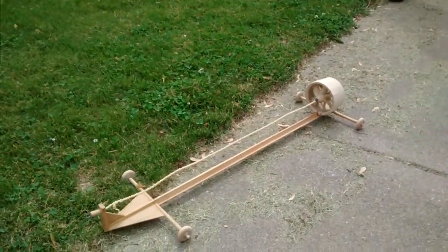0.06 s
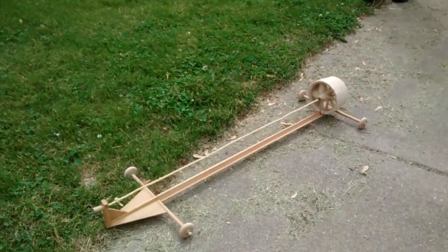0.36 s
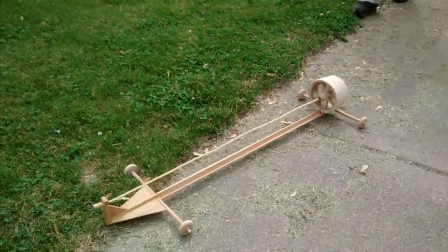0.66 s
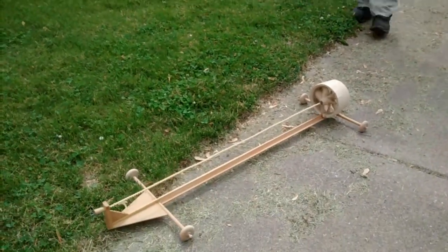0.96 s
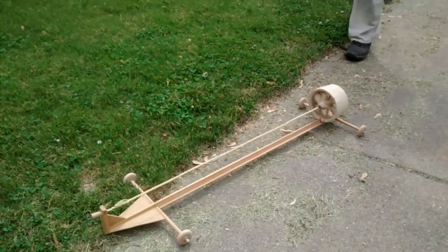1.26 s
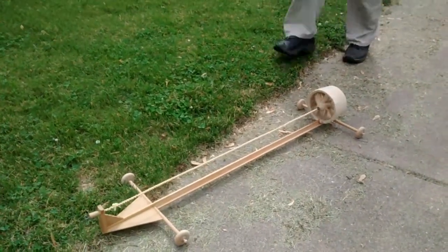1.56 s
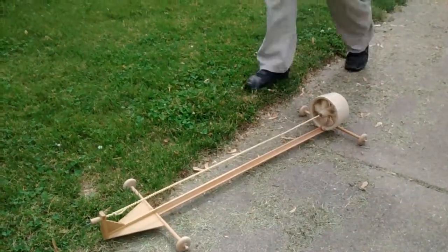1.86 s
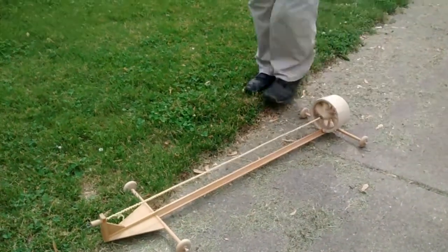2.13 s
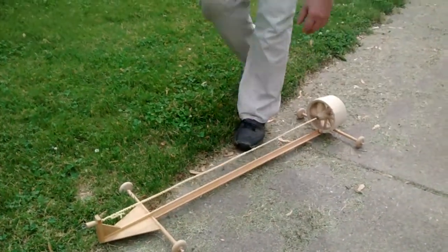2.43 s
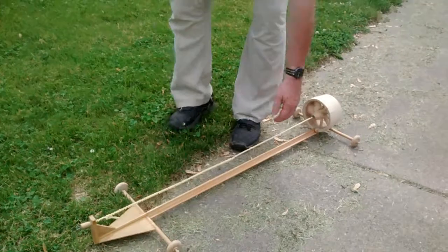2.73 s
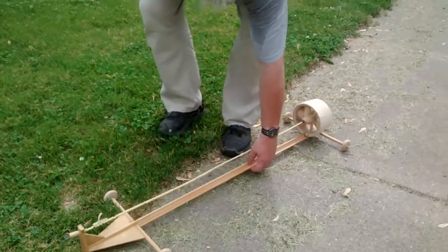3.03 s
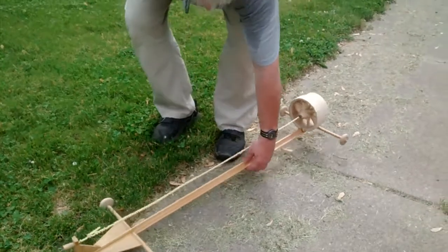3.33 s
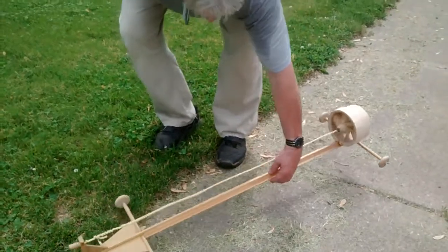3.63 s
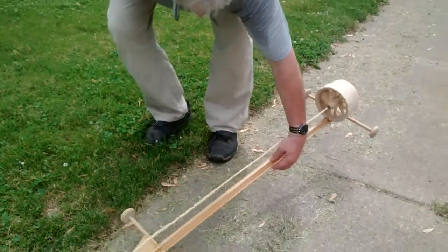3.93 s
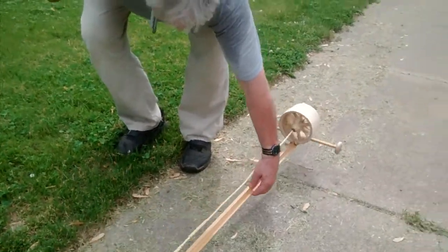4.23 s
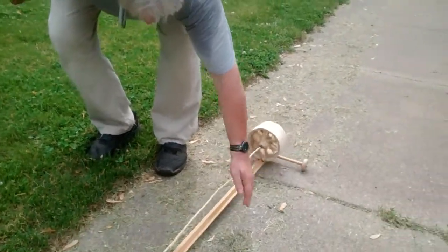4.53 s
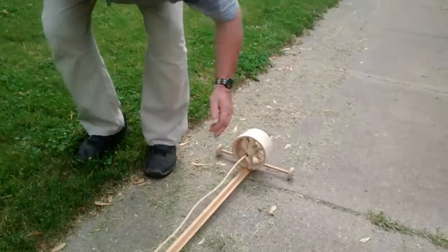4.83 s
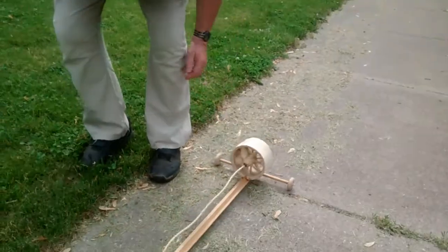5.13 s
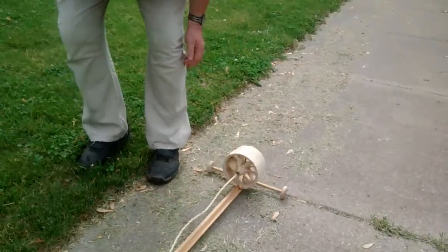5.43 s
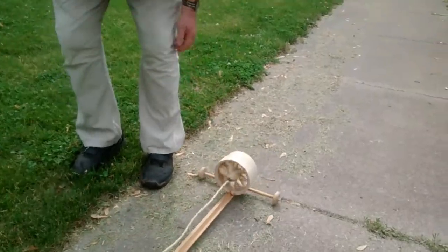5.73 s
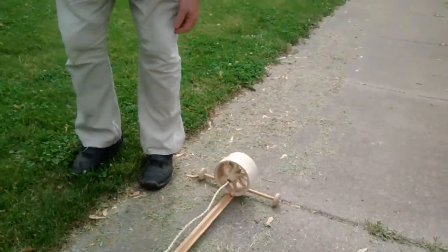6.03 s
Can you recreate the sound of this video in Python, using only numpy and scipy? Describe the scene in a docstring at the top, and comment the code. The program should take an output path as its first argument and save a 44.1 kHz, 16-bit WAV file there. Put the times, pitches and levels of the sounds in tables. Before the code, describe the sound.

The loose rotor of a wooden rubber-band toy car spins close by, clattering rapidly in its drum over a dry whirr. Grit clicks as the car is lifted, the rotor scrapes and the frame knocks. The car lands bouncing on concrete and the rotor stops suddenly, leaving light taps. Throughout, something like a ball thumps in the distance about once a second, echoing over a soft outdoor hush.

```python
"""A rubber-band wooden fan car runs on a garden pavement, its loose rotor clattering in the drum
over a dry whirr of wood rubbing wood. As the car is lifted, grit clicks, the rotor scrapes and the
spar knocks; it lands bouncing on its wheels and the rotor stops. Light taps follow. About once a
second something like a bouncing ball thumps farther off and echoes from the houses, over a soft hush."""
import sys
import numpy as np
from scipy import signal
from scipy.fft import rfft
from scipy.io import wavfile

SR = 44100
rng = np.random.default_rng(int(sys.argv[2]) if len(sys.argv) > 2 else 0)


def wav_out(sig):
    """Save sig, one row per channel (or a flat mono array), as 16-bit PCM at SR to the path in sys.argv[1]."""
    wavfile.write(sys.argv[1], SR, np.round(np.clip(np.atleast_2d(sig).T, -1, 1) * 32767).astype(np.int16))


N = 276948
T = np.arange(N) / SR


def gain_of(db):
    """Decibels to amplitude."""
    return 10 ** (np.asarray(db) / 20)


def unit_rms(x):
    """Scales to rms 1."""
    return x / np.sqrt(np.mean(x ** 2) + 1e-20)


def add(mix, start_s, sound):
    """Mixes a stereo sound in at start_s."""
    part = mix[:, max(round(start_s * SR), 0):][:, :sound.shape[1]]
    part += sound[:, :part.shape[1]]


def wander(per_s):
    """A random curve of roughly unit spread with per_s new values a second."""
    steps = np.clip(rng.standard_normal(size=1024), -2, 2)
    return np.interp(T * per_s, np.arange(len(steps)), steps)


def band(x, low_hz, high_hz):
    """One frequency band of x, in phase with x."""
    return signal.filtfilt(*signal.butter(2, [low_hz, high_hz], "bandpass", fs=SR), x)


def body(drive, colour, modes=(), size=8192):
    """Rings a body of unit overall gain: colour is its broad stereo EQ, modes are its resonant peaks."""
    hz = abs(np.fft.fftfreq(size, 1 / SR))
    points_hz, *columns = np.transpose(colour)
    left_db, right_db, likeness = (np.interp(np.log(hz + 1), np.log(points_hz + 1), c) for c in columns)
    lift_db = sum(db / (1 + (2 * (hz - f) / width) ** 2) for f, width, db in modes)
    gains = gain_of(np.array([left_db, right_db]) + lift_db)
    gains /= np.sqrt(np.mean(gains.mean(0) ** 2))
    minimum_phase = np.exp(-1j * signal.hilbert(np.log(gains.mean(0))).imag)
    likeness = np.clip(likeness, -1, 1)  # left-right correlation
    # drive[0] reaches both ears, drive[1] only the right
    paths = np.array([gains[0], gains[1] * likeness, gains[1] * np.sqrt(1 - likeness ** 2)])
    rings = np.fft.fftshift(np.fft.ifft(paths * minimum_phase).real, axes=1)
    rung = signal.fftconvolve(drive[[0, 0, 1]], rings, axes=1)
    left, right_shared, right_own = rung[:, size // 2:][:, :N]
    return np.array([left, right_shared + right_own])


def blows(rows, loose, tail_db, tail_t60, rise_s=0.0019, size=6000, level_band_hz=None):
    """Each row (start_s, level_db, t60_s) is a click, chatter and a tail; loose is the chatter's share."""
    t, hz = np.arange(size) / SR, np.fft.rfftfreq(size, 1 / SR)
    drive = np.zeros((2, N))
    swell = 1 - np.exp(-t / rise_s)
    for s, db, t60 in rows:
        chatter, tail = swell * rng.standard_normal((2, 2, size))
        chatter = np.sqrt(loose) * unit_rms(chatter * gain_of(-60 * t / t60))
        tail = gain_of(tail_db) * unit_rms(tail * gain_of(-60 * t / tail_t60))
        blow = (chatter + tail) / np.sqrt(size)
        blow[0, 0] += np.sqrt(1 - loose)  # the click
        if level_band_hz:  # set the blow's strength within this band
            inside = (hz > level_band_hz[0]) & (hz < level_band_hz[1])
            blow[0] /= np.sqrt(np.mean(abs(rfft(blow[0])[inside]) ** 2))
        blow[1] *= np.linalg.norm(blow[0]) / np.linalg.norm(blow[1])
        add(drive, s, gain_of(db) * blow)
    return drive


BLADES_PER_S = 96
CHATTER_T60_S, HARD_HIT_DB = .01, -22.7  # hits above this level chatter longer and crack
# the drum's resonances: pitch_hz, width_hz, lift_db
DRUM_MODES = [(449.7, 19, 9), (740, 67, 6.5), (970, 40, 8.5), (1224, 86, 6.5), (1622, 58, 5.5),
              (1743, 170, 2.5), (3555, 290, 3.5), (4700, 250, 4), (5970, 110, 4), (6422, 110, 3)]


def drum(drive, colour, detune):
    """The rotor's contact wanders between three spots of the drum, tuned low, middle and high."""
    spot = np.clip(np.round(wander(BLADES_PER_S / 2)), -1, 1)
    out = np.zeros((2, N))
    for k in (-1, 0, 1):
        modes = [(hz * (1 + detune * k), width, db) for hz, width, db in DRUM_MODES]
        out += body(drive * (spot == k), colour, modes)
    return out


# how hard the rotor rubs: time_s, level_db
RUBBING = [(0, -28), (0.44, -28), (0.62, -31.5), (1.34, -30), (2.22, -32.5), (3.12, -32.5), (3.25, -36),
           (3.35, -30.5), (3.881, -36), (4.12, -30.5), (4.64, -32)]
# moments when it spins clear of the drum: centre_s
LULLS = [0.49, 0.628, 0.74, 0.842, 0.972, 1.09, 1.345, 1.525, 1.69, 1.768, 1.95, 2.135, 2.228, 2.325, 2.89,
         3.245]


def rotor_level(lull_db=-8, lull_half_s=.013, stop_s=4.65, stop_db_per_s=1100):
    """The rotor's contact strength sinks in each lull and dies quickly when the rotor stops."""
    clear = sum(np.exp(-((T - s) / lull_half_s) ** 2) for s in LULLS)
    stop_db = stop_db_per_s * np.maximum(T - stop_s, 0)
    return gain_of(np.interp(T, *np.transpose(RUBBING)) + lull_db * clear - stop_db)


# dry, midrange rub: freq_hz, left_db, right_db, likeness
WHIRR_COLOUR = [(208, -31, -14, -1.44), (420, -13.5, -11.5, 0.91), (1020, -2.5, -2.5, 1),
                (1670, -1.5, 3.5, 0.97), (1960, -3.5, 4.5, -0.33), (2350, -7.5, -8, -0.22),
                (3170, -5, 0, 0.19), (4240, -14.5, -12.5, 0.93), (4600, -24, -20, 1),
                (5300, -23, -26, 0.89), (6300, -25, -23.5, 0.91), (8940, -26, -31, 1),
                (9800, -51, -61, -0.98), (15000, -43, -47, 0.62)]


def whirr(level_db=-1.5, slips_per_s=1500, spread_db=3):
    """Wood rubs on wood in tiny slips of uneven strength."""
    slips = rng.random(N) < slips_per_s / SR
    strength = gain_of(spread_db * np.minimum(rng.exponential(1, N), 4))
    drive = unit_rms(slips * strength * rng.standard_normal((2, N)))
    return drum(drive * rotor_level() * gain_of(level_db), WHIRR_COLOUR, detune=.018)


def blade_ticks(level_db=20, scatter_db=4.5, jitter=0.1417):
    """The passing blades tick lightly on the drum, slightly out of step."""
    passes = np.arange(int(5.1 * BLADES_PER_S))
    late, force = np.clip(rng.standard_normal((len(passes), 2)).T, -2, 1)
    starts = (passes + jitter * late) / BLADES_PER_S
    rows = [(s, db, CHATTER_T60_S) for s, db in zip(starts, level_db + scatter_db * force)]
    return blows(rows, loose=0.5, tail_db=-8.5, tail_t60=0.012, size=1000) * rotor_level()


# regions of the drum's ring that each blade favours differently: low_hz, high_hz, spread_db
STRIKE_BANDS = [(1400, 1900, 2), (1900, 2500, 3), (2750, 3300, 2.5), (3500, 4400, 2), (4960, 7400, 4)]
# bright, woody clack: freq_hz, left_db, right_db, likeness
CLACK_COLOUR = [(245, -28.5, -28, 1.5), (790, -22.5, -23, 0.6), (1183, -12, -13.5, 2.5),
                (1667, -9, -0.5, 0.62), (2085, -15, -9, 0.06), (2630, -25, -31, -1),
                (2846, -5.5, -7.5, 1.5), (3775, -6, -1, 1), (3897, -15.5, -8, 0.5), (4860, -31, -19, -1.5),
                (5650, -20, -27, -3), (5780, -35.5, -28.5, 2.2), (7920, -28, -40.5, -2.13),
                (7980, -23.5, -21, -1), (9600, -56, -71, 4.5)]


def clatter(hard_db=23.5):
    """Light ticks and hard strikes ring the drum; each blade hits its own spot, so the tone shifts."""
    drive = blade_ticks() + gain_of(hard_db) * hard_strikes()
    shifts = sum((gain_of(spread_db * wander(BLADES_PER_S)) - 1) * band(drive, low, high)
                 for low, high, spread_db in STRIKE_BANDS)
    return drum(drive + shifts, CLACK_COLOUR, detune=.028)


# the outdoor bed, which dips briefly near 4.7 s: time_s, level_db
YARD_LEVEL = [(0, -40.5), (4.0, -40.5), (4.72, -44.5), (4.9, -44), (5.3, -42), (6.28, -40.5)]
# low rumble and soft air: freq_hz, left_db, right_db, likeness
YARD_COLOUR = [(22, 6, 6.5, -1.2), (66, -6.5, -5, 0.024), (143, -5.5, -1.5, 0.2), (315, -8, -7, 0.63),
               (715, -4, -4.5, 0.97), (1490, -10, -5, 0.94), (2580, -8, -4, -1.18),
               (3580, -14, -12.5, 0.81), (4400, -28, -12.5, -0.88), (5340, -20, -22.5, -0.42),
               (14900, -33.5, -33, 0.14)]
# peaks in the hush: pitch_hz, width_hz, lift_db
YARD_MODES = [(71.4, 7.4, 5.2), (126.6, 6, 13.6), (463, 57, 3.9), (1440, 190, 7.3), (3650, 190, 7.7)]


def yard(waver_db=1.5, wavers_per_s=19):
    """Gently wavering outdoor hush."""
    level_db = np.interp(T, *np.transpose(YARD_LEVEL)) + waver_db * wander(wavers_per_s)
    return body(rng.standard_normal((2, N)) * gain_of(level_db), YARD_COLOUR, YARD_MODES)


# single hits of the loose rotor on its drum: start_s, level_db
CLACKS = [(0.0267, -22.5), (0.0436, -23.5), (0.0693, -18.5), (0.1158, -24.0), (0.1317, -23.0),
          (0.1415, -19.0), (0.2052, -25.0), (0.215, -24.0), (0.2333, -22.5), (0.242, -21.0),
          (0.2591, -19.5), (0.2735, -23.0), (0.2868, -16.5), (0.3005, -16.0), (0.3205, -23.0),
          (0.3299, -21.0), (0.3509, -16.5), (0.3707, -23.0), (0.3877, -20.5), (0.4327, -20.0),
          (0.4428, -16.0), (0.4592, -21.5), (0.5307, -25.0), (0.5525, -24.5), (0.7541, -23),
          (0.7634, -23.5), (0.79, -22.5), (0.8061, -17.5), (0.8185, -17.5), (0.8575, -21.5),
          (0.8743, -18.0), (0.8844, -18.0), (0.9015, -21.0), (0.9107, -20.5), (0.9215, -19.0), (0.934, -22),
          (0.9393, -19.5), (0.9515, -24.0), (0.9608, -18.0), (0.9902, -21.5), (0.9992, -24.0),
          (1.016, -15.5), (1.0374, -22.5), (1.1235, -23.0), (1.1302, -22.5), (1.1812, -21.5),
          (1.1885, -15.0), (1.1959, -16.5), (1.2498, -23.0), (1.2847, -23.5), (1.309, -24.5), (1.3475, -25),
          (1.421, -23.5), (1.4423, -23.5), (1.4702, -21.5), (1.478, -23), (1.4876, -21.5), (1.4979, -23.5),
          (1.5486, -20.5), (1.558, -22.5), (1.5681, -22.5), (1.5763, -25.0), (1.5853, -22.0),
          (1.7221, -24.5), (1.8136, -25.0), (1.9104, -25.0), (1.9188, -23.5), (2.0117, -19.5),
          (2.0397, -24.0), (2.067, -25.0), (2.0852, -20.5), (2.1769, -19.0), (2.1992, -23.5),
          (2.2471, -22.5), (2.2774, -24.0), (2.289, -26.0), (2.3427, -20.0), (2.3515, -24.5),
          (2.3645, -23.0), (2.4223, -24.5), (2.4319, -23), (2.451, -24.5), (2.5205, -24.5), (2.5295, -23.0),
          (2.5548, -25.0), (2.5975, -21.0), (2.6161, -23.5), (2.7345, -21.0), (2.8001, -24.0),
          (2.838, -24.0), (2.8493, -18.5), (2.9218, -23.5), (2.9306, -24.5), (3.0978, -15.0), (3.208, -28),
          (3.325, -23.0), (3.3426, -22.5), (3.3642, -23.0), (3.501, -24.0), (3.554, -22.5), (3.582, -25.0),
          (3.625, -26.0), (3.715, -19.5), (3.8152, -27.0), (4.0722, -22.0), (4.0921, -22.0)]


def hard_strikes(bite_db=4, unwind_s=1.1, rise_s=.0007, chatter_s_per_db=.0012, low_lag=.5):
    """Harder hits are brighter and longer, with a scratchy bite while the rubber band is wound tight."""
    singles = [(s, db, CHATTER_T60_S + chatter_s_per_db * max(db - HARD_HIT_DB, 0)) for s, db in CLACKS]
    rows = sorted(singles + rattles())
    drive = blows(rows, loose=0.64, tail_db=-12.5, tail_t60=0.07, rise_s=rise_s, size=4000,
                  level_band_hz=(2900, 3800))  # the drum's main ring
    starts, levels_db, _ = np.transpose(rows)
    latest_hit = np.maximum(np.searchsorted(starts, T + rise_s) - 1, 0)
    excess_db = np.maximum(levels_db[latest_hit] - HARD_HIT_DB, 0)
    # the low ring grows less with force than the main one
    low_cut = (gain_of(-low_lag * excess_db) - 1) * band(drive, 1100, 2400)
    bite = gain_of(bite_db) * np.exp(-T / unwind_s) * band(drive, 5300, 7400)
    return drive + low_cut + bite


# sharp treble edge: freq_hz, left_db, right_db, likeness
CRACK_COLOUR = [(1520, -26, -26, 0.63), (2220, -0.5, 8.5, 0.19), (4301.6, 4, 10, 0.2), (5130, -8, -9, 0.64),
                (6300, -3, -3.5, 0.41), (8340, -13, -19, 0.28), (10000, -25, -34, 0.33),
                (14900, -31, -28, 0.46)]


def cracks(level_db=-13, growth=.9):
    """The hardest strikes add a short, bright crack of bare wood on wood."""
    rows = [(s, level_db + growth * (db - HARD_HIT_DB), .008) for s, db in CLACKS if db > HARD_HIT_DB]
    return body(blows(rows, loose=.4, tail_db=-14, tail_t60=.03, size=2000), CRACK_COLOUR)


# softer runs of blade strikes between the clacks: start_s, length_s, level_db
RATTLES = [(0.181, 0.023, -27), (0.501, 0.018, -26), (0.642, 0.028, -28), (1.047, 0.02, -28),
           (1.108, 0.015, -27), (1.262, 0.07, -27), (1.598, 0.028, -27), (1.641, 0.035, -27),
           (1.789, 0.056, -28), (1.86, 0.045, -27), (2.39, 0.028, -28), (2.645, 0.05, -28),
           (3.06, 0.03, -30), (3.292, 0.03, -29), (3.42, 0.035, -27), (3.903, 0.09, -29)]


def rattles(hits_per_s=108, fade_db=-3, scatter_db=2, jitter=.1, max_hits=12):
    """Rows for blows: in each run the blades strike at a nearly even rate, weakening towards the end."""
    rows, hit = [], np.arange(max_hits)
    for start_s, length_s, db in RATTLES:
        late, force = np.clip(rng.standard_normal((2, max_hits)), -1.5, 1.5) * (hit > 0)
        ages = (hit + jitter * late) / hits_per_s
        levels_db = db + fade_db * ages / length_s + scatter_db * force
        shares = np.clip(length_s * hits_per_s - hit, 0, 1)  # softens the last hit
        rows += [(start_s + age, hit_db + 20 * np.log10(share), CHATTER_T60_S)
                 for age, hit_db, share in zip(ages, levels_db, shares) if share > 0]
    return rows


# distant bounces: start_s, boom_db, slap_db
THUMPS = [(0.416, -33.5, -21), (1.379, -32, -20), (2.527, -29.5, -21), (3.402, -30.5, -19),
          (4.281, -32, -22.5), (5.342, -31.5, -24.5), (6.196, -36, -30)]
# the direct sound, then its echoes off the houses: delay_s, gain_db
ARRIVALS = [(0, 2.5), (0.036, -8.5), (.076, -3), (.145, -10.5)]
# deep, round boom: freq_hz, left_db, right_db, likeness
BOOM_COLOUR = [(25, -10, -19, .3), (53.7, -9, -1, 0.73), (97, 8, 8, 0.87), (140, -3.5, -1.5, 0.91),
               (220, -6, -3.5, 0.76), (400, -16, -42, 0.98), (1500, -86, -89, .9)]
# soft midrange slap: freq_hz, left_db, right_db, likeness
SLAP_COLOUR = [(170, -8, -11, 0.87), (340, -8, -7.5, 0.82), (754, -6, -3.5, 1), (1180, -1.5, 0.5, 1),
               (2060, -17, -2.5, 0.46), (3630, -37, -15, 0.067), (6130, -35, -23, 0), (13900, -63, -64, 0)]


def thumps(boom_db=24, slap_db=18.5, echo_slap_db=-9, second_slap_s=.013, second_slap_db=-7):
    """A low boom with a soft double slap; the walls send it back duller."""
    booms = [(s + delay, db + path_db, .05) for s, db, _ in THUMPS for delay, path_db in ARRIVALS]
    slaps = [(s + delay, db + path_db + echo_slap_db * (delay > 0), .026)
             for s, _, db in THUMPS for delay, path_db in ARRIVALS]
    slaps += [(s + second_slap_s, db + second_slap_db, .026) for s, _, db in THUMPS]
    boom = body(blows(booms, loose=0.12, tail_db=-7, tail_t60=0.22), BOOM_COLOUR)
    slap = body(blows(slaps, loose=.9, tail_db=-6, tail_t60=.11, rise_s=.0012), SLAP_COLOUR)
    return gain_of(boom_db) * boom + gain_of(slap_db) * slap


# the hand closes on the frame: time_s, grip_share
GRIP = [(3.15, 0), (3.45, 0.75)]
# the held car's ring sinks and turns hollow: centre_hz, width_hz, change_db
GRIP_EQ = [(1690, 300, -7), (1500, 80, 5), (880, 380, 4), (2960, 160, -6), (3610, 260, -16)]


def hand_grip(sound):
    """The hand damps some resonances of the frame and lets others through."""
    grip = np.interp(T, *np.transpose(GRIP))
    change = sum((gain_of(db) - 1) * signal.lfilter(*signal.iirpeak(hz, hz / width, SR), sound)
                 for hz, width, db in GRIP_EQ)
    return sound + grip * change


# clicks under the wheels: start_s, level_db
GRIT_CLICKS = [(3.408, -1), (3.456, 7), (4.5, -6), (4.572, -3)]
# bright, dry snap: freq_hz, left_db, right_db, likeness
GRIT_COLOUR = [(400, -10, -10.5, 1), (1360, 9.5, 12, 1), (2460, 3, 7, 0.011), (4130, 7, 9, 0.38),
               (7850, -11, -7, 0.3), (9200, -15, -37, 0.098), (10100, -42, -26, 0), (15000, -45, -47, 0)]


def grit():
    """Grit clicks as the wheels leave and meet the concrete."""
    drive = blows([(s, db, .02) for s, db in GRIT_CLICKS], loose=0.92, tail_db=-8, tail_t60=0.09)
    return body(drive, GRIT_COLOUR)


# drags along the drum wall: start_s, length_s, level_db
SCRAPES = [(3.812, 0.074, -36), (3.9, 0.153, -33)]
# narrow ring near 3 kHz: freq_hz, left_db, right_db, likeness
SCRAPE_COLOUR = [(999, -41, -27, 1), (2600, -24, -11, 0.15), (2950, 3, 4, 0.92), (3620, -3, 1, 0.83),
                 (3700, -21, -27, 1), (6000, -50, -52, 0)]


def scrape(rasp_db=9, edge_s=0.0065):
    """The lifted rotor rubs steadily on the drum, rasping at the blade rate."""
    level = sum(gain_of(db) * np.clip(np.minimum(T - s, s + length - T) / edge_s, 0, 1)
                for s, length, db in SCRAPES)
    rasp = gain_of(rasp_db * np.sin(2 * np.pi * BLADES_PER_S * T))
    return body(unit_rms(rng.standard_normal((2, N)) * rasp) * level, SCRAPE_COLOUR)


# knocks on the held spar: start_s, level_db, low_modes_change_db
KNOCKS = [(4.1217, -6, 0.5), (4.131, -14, 3), (4.14, -11, 4), (4.177, -17, 7), (4.21, -5.5, 0.5),
          (4.38, -9, -7), (4.421, -28, 17.5)]
# light wooden frame: freq_hz, left_db, right_db, likeness
FRAME_COLOUR = [(150, -46, -53, -1.2), (437, -24, -23, 1), (690, -8.5, -10, 0.96), (1020, -14, -16, 1),
                (1635, -13, 0.5, 0.96), (2220, -14, -2, -1.03), (2440, -6.5, -6, -0.67),
                (3500, -8.5, -3.5, -0.15), (4300, -20, -15.5, 0.16), (4850, -18, -16.5, -0.73),
                (6500, -21.5, -19, -0.22), (9100, -30.5, -32.5, 0.58), (9900, -46, -48, -0.065),
                (15000, -45, -60, 0.07)]
# the frame's resonances: pitch_hz, width_hz, lift_db
FRAME_MODES = [(1470, 40, 6), (1680, 36, 5), (1830, 50, 6), (2300, 130, 2), (2670, 70, 8)]


def frame_knocks(level_db=9):
    """Each knock in the hand briefly rattles the light parts of the frame."""
    drive = blows([(s, db, .014) for s, db, _ in KNOCKS], loose=.6, tail_db=-1, tail_t60=0.16)
    return gain_of(level_db) * body(band(drive, 400, 14000), FRAME_COLOUR, FRAME_MODES)


# bending modes of the long spar: pitch_hz, level_db, t60_s, left_ear_db
SPAR_MODES = [(1260, -14, .045, -1), (1510, -7.5, .08, -6), (1840, -7, .07, -14), (2210, 0, .035, -9),
              (2420, -5, .03, -7), (2900, -11, .035, -1), (4430, -6, .032, -9), (5000, -20, .025, 1),
              (6650, -21, .024, -1)]


def spar_ring(level_db=-2.5, left_lag_s=.00012, low_modes_below_hz=2000):
    """Off the ground, each knock rings the spar; the sound reaches the left ear a little later."""
    t, out = np.arange(8000) / SR, np.zeros((2, N))
    left_only = np.array([[1], [0]])
    age = np.maximum(t - left_lag_s * left_only, 0)
    for s, knock_db, low_db in KNOCKS:
        detune = 1 + 0.03 * rng.standard_normal(len(SPAR_MODES))
        for k, (hz, mode_db, t60, left_db) in enumerate(SPAR_MODES):
            peak_db = level_db + knock_db + mode_db + low_db * (hz < low_modes_below_hz)
            envelope = gain_of(peak_db + left_db * left_only - 60 * age / t60)
            add(out, s, (-1) ** k * envelope * np.sin(2 * np.pi * hz * detune[k] * age))
    return signal.lfilter(*signal.butter(2, [900, 8000], "bandpass", fs=SR), out)


# the wheels land, bounce and settle: start_s, level_db
LANDINGS = [(4.481, -3), (4.491, -5), (4.501, -6), (4.511, -22), (4.537, -12.5), (4.545, -11.5),
            (4.552, -9.5), (4.5717, -4.5), (4.589, -13), (4.606, -17), (4.641, -16)]


def landings(level_db=14.5, hollow_hz=775, hollow_db=-19.5, hollow_t60=.08):
    """On its wheels the whole frame clatters; the first touchdown rings a hollow note."""
    drive = blows([(s, db, .014) for s, db in LANDINGS], loose=.7, tail_db=-6.5, tail_t60=0.13)
    out = gain_of(level_db) * body(drive, FRAME_COLOUR, FRAME_MODES)
    t = T[T < hollow_t60]
    note = gain_of(hollow_db - 60 * t / hollow_t60) * np.sin(2 * np.pi * hollow_hz * t)
    add(out, LANDINGS[0][0], np.array([note, note]))
    return out


# light taps and scuffs: start_s, level_db, t60_s
TAPS = [(4.712, -26, 0.08), (4.8025, -23.5, 0.09), (4.943, -29, 0.05), (5.137, -26, 0.05),
        (5.173, -21, 0.044), (5.309, -22.5, 0.2), (5.439, -22.5, 0.073), (5.463, -14, 0.02),
        (5.892, -22.5, 0.036), (6.126, -25, 0.028), (6.269, -22.5, 0.021)]
# dull wooden tap: freq_hz, left_db, right_db, likeness
TAP_COLOUR = [(450, -26, -23, 0.8), (720, -3.5, -5, 1), (950, -8, -10, 1), (1560, -3.5, 6, 1),
              (2270, -9.5, -3, -0.88), (2840, -8, -4, -0.73), (3740, -16, -12.5, 0.98),
              (4340, -26, -19, -0.4), (14000, -45, -49, -0.14)]
# the resting car's resonances: pitch_hz, width_hz, lift_db
TAP_MODES = [(730, 45, 4), (1610, 70, 4), (2300, 130, 11)]


def taps(level_db=14, firm_db=-16, ring_db=2):
    """Small, dull contacts around the resting car; a firm one wakes its hollow note and bright ring."""
    drive = blows(TAPS, loose=0.97, tail_db=-6.5, tail_t60=0.089)
    ring_rows = [(s, 2 * db - firm_db + ring_db, t60) for s, db, t60 in TAPS]  # 2 dB per dB of tap
    ring = blows(ring_rows, loose=1, tail_db=-6, tail_t60=.1)
    hollow, bright = band(ring, 650, 800), 2 * band(ring, 3100, 4100)
    return gain_of(level_db) * body(drive + hollow + bright, TAP_COLOUR, TAP_MODES)


def scene():
    """The rotor, the handling of the car and the garden around it."""
    rotor = hand_grip(clatter() + whirr()) + cracks() + scrape()
    handling = frame_knocks() + spar_ring() + landings() + grit() + taps()
    return rotor + handling + thumps() + yard()


def record(dry, low_cut_hz=30, high_cut_hz=15350):
    """The microphone's bass roll-off, the full-scale limit, then the band limit."""
    thinned = signal.lfilter(*signal.butter(2, low_cut_hz, "highpass", fs=SR), dry)
    low_pass = signal.firwin(401, high_cut_hz, window=("kaiser", 8), fs=SR)
    return signal.oaconvolve(np.clip(thinned, -1, 1), low_pass[None], "same")


dry = scene()
out = record(dry)
wav_out(out)
```